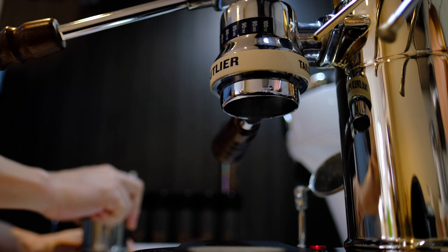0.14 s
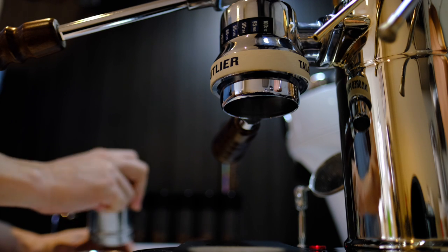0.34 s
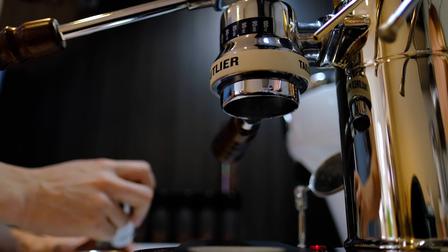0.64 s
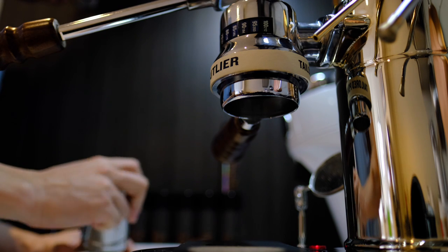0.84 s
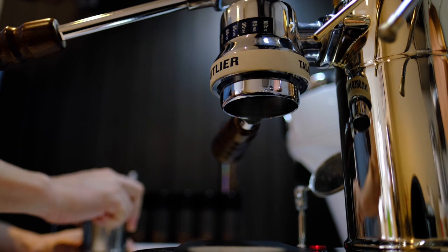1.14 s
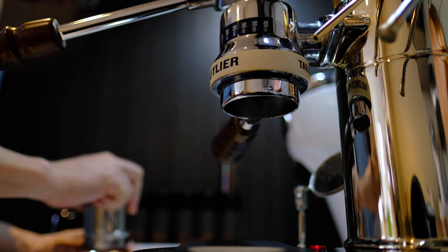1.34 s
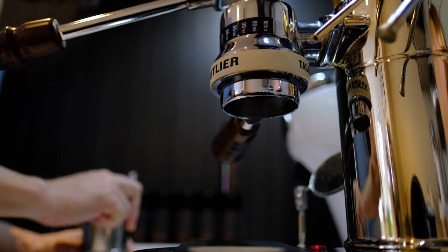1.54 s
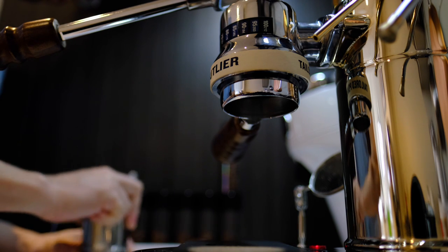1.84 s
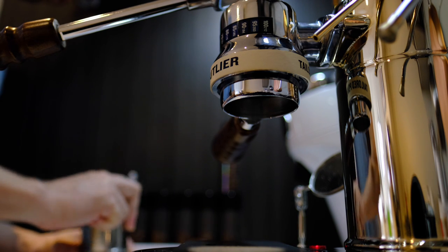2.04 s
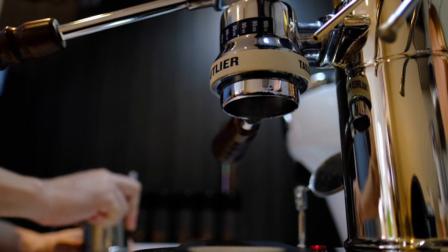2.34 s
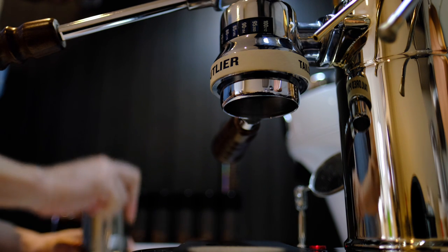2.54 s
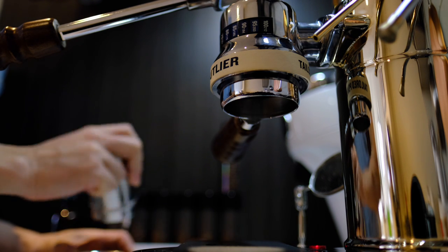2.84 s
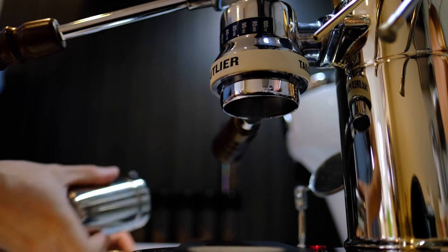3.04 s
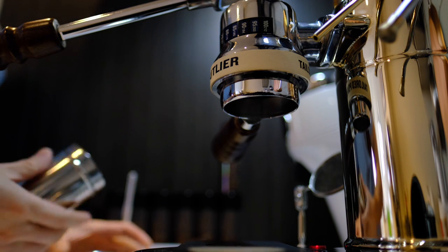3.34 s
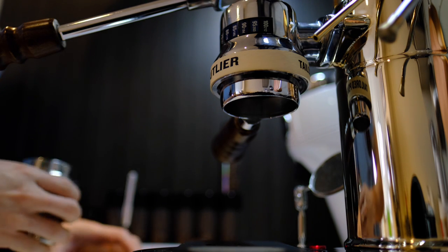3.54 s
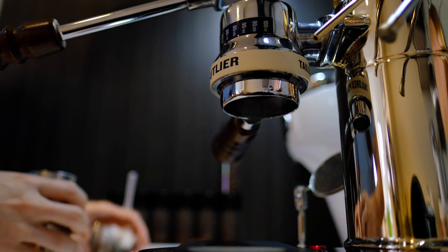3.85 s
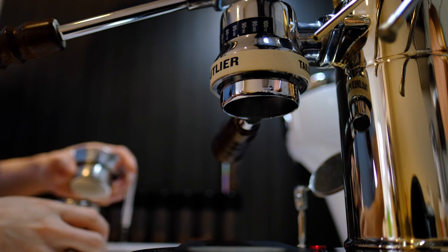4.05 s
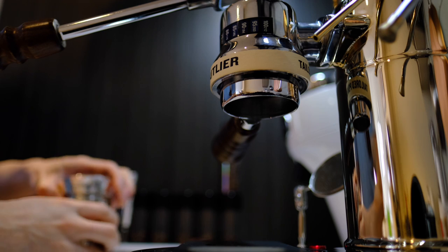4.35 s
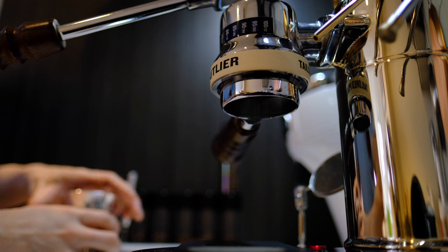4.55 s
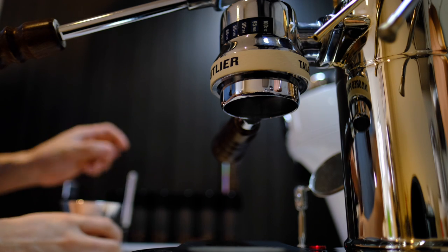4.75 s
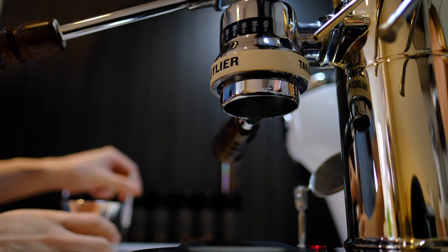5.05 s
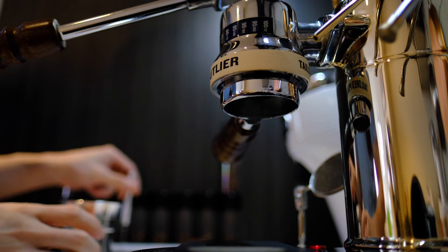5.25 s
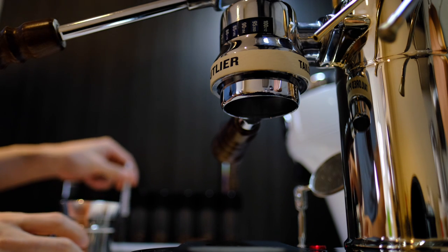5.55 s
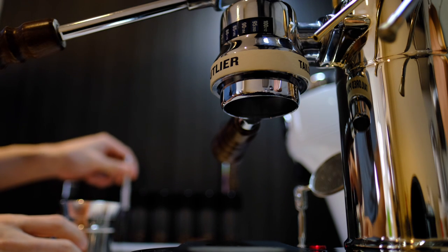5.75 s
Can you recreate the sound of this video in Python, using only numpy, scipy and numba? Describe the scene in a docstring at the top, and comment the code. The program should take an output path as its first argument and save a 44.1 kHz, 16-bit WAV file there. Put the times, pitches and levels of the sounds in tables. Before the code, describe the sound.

A steel cup knocks sharply and repeatedly on a portafilter, then clinks, and a small glass is set down over a faint machine hum.

```python
"""A steel dosing cup knocks on a portafilter at an espresso machine, then slides off, clinks and is set down.
Each blow is a noise crack, a thud and the ringing modes of the struck piece. A small glass lands and rocks,
a faint, very high whistle glides and a small tool tinks. The close blows overload the microphone; its gain
control ducks the room and lets it swell back. Machine hum, ventilation and a thin hiss lie underneath."""
import sys
import numpy as np
from scipy import signal
from scipy.fft import rfft, irfft
from scipy.io import wavfile
from scipy.ndimage import uniform_filter1d
from numba import njit

SR = 44100
rng = np.random.default_rng(int(sys.argv[2]) if len(sys.argv) > 2 else 0)


def output_pcm(signal):
    """Save a mono or channel-first signal as 16-bit PCM at the path in sys.argv[1].

    Samples are clipped to [-1, 1] before scaling.
    """
    pcm = np.clip(np.atleast_2d(signal).T, -1, 1) * 32767
    wavfile.write(sys.argv[1], SR, np.round(pcm).astype(np.int16))


N = 260190
T = np.arange(N) / SR

# Blows. Each row: start in seconds, level in dB, thud pitch in Hz, thud level in dB relative to the crack.
CUP_KNOCKS = [(0.0, -17.5, 1080, -2), (0.1877, -10.5, 776, 5.5), (1.5384, 3.5, 738, 2),
              (1.5445, 4, 1581, -4), (1.8208, 6, 966, -7), (2.0746, 8.5, 954, -6), (2.3373, 3, 900, 3),
              (2.5974, 10.5, 1040, -12)]  # on the portafilter
CUP_SEATING = [(1.0211, -15.3, 1141, 1)]  # into the basket rim
CUP_CLINKS = [(3.262, -68, 2780, 16), (3.384, -62, 902, -6), (3.554, -60, 2730, 10), (3.671, -61, 2730, -8),
              (4.1965, -10, 817, 10), (4.229, -27, 1400, 12), (4.404, -12, 1576, -3),
              (4.412, -13, 1570, -10)]  # loose, bouncing
GLASS_LANDING = [(4.7178, -12.5, 977, 13), (4.7215, -19, 1590, 16)]  # one edge, then flat
TOOL_TINKS = [(5.131, -49.5, 2160, -5), (5.549, -55.5, 2170, -10)]  # against the rim

# Modes of the struck pieces. Each row: frequency in Hz, level in dB, t60 in seconds.
PORTAFILTER_MODES = [(205, -25.5, .16), (1616, -3.5, .035), (2096, -4, .04), (2727, -5, .04),
                     (3130, -1.5, .04), (3400, -2.5, .04), (3660, 1, 0.034), (3781, -4.5, 0.065),
                     (6310, -13.5, 0.045), (8004, -12.5, .04), (9130, -12.5, .04), (9500, -10.5, 0.02),
                     (13040, -9, 0.06)]
RIM_MODES = [(701, -8.5, .03), (1480, -10, 0.06), (2010, -10, .04), (2710, -7.5, .06), (2800, -12, 0.16),
             (2900, -11.5, 0.19), (2970, -4.5, .07), (3780, -15, .15), (4716, -2, 0.045), (5270, -2, 0.04),
             (5800, -1.5, .035), (7440, -12.5, .08), (9162, -1, 0.05), (10370, -2.5, .04),
             (11750, -6.5, .05)]
CUP_MODES = [(1664, -8, .035), (2400, -9, 0.024), (2760, -11.5, .11), (2910, -11, .05), (3765, -1, 0.035),
             (3777, -18, .45), (3786, -22, .4), (5405, -7, .1), (7320, -4, .06), (7410, -1, .06),
             (7620, -5, .1), (7960, -3, .02), (8350, -16.5, .08), (9340, -17, .06), (12700, -14, .08)]  # the close pair beats
GLASS_MODES = [(137, -18, 0.09), (210, -24, .12), (923, -16.5, 0.17), (1650, -8.5, 0.037), (2790, -14, .1),
               (3700, -5, 0.035), (5750, -28, .08), (7405, -2, 0.07), (8400, -16, 0.046),
               (12845, -11, 0.11)]  # includes the boom of the tray
TOOL_MODES = [(2220, 0, 0.25), (3418, -12, .16), (5599, -5, 0.16), (12748, -10, .12)]

# Metal sliding on metal. Each row: peak time in seconds, half-width in seconds, level in dB, centre in Hz.
METAL_SLIDES = [(1.222, .05, -48.5, 1430), (3.645, 0.043, -60, 5970), (4.332, 0.018, -36.5, 2800),
                (4.401, .004, -32, 5500), (5.629, 0.089, -68, 7000)]
# Room decay. Each row: frequency in Hz, t60 in seconds.
ROOM_DECAY = [(200, 0.41), (1000, 0.64), (3000, 0.54), (7000, 0.46), (14000, 0.23)]
# Mains and fan lines. Each row: frequency in Hz, rms level in dB.
HUM_LINES = [(59.5, -56.5), (119.6, -50.5), (212, -63.5), (223, -62), (550, -61.5), (1710, -74)]
# Noise spectra. Each row: frequency in Hz, relative spectral density in dB.
CRACK_SPECTRUM = [(25, -26.5), (90, -17.5), (200, -2.5), (380, -5.5), (700, -4), (1500, 0), (3200, -1),
                  (4400, -5), (6500, -5), (8500, -3.5), (11000, -5), (13500, -2), (16000, -7.5)]
VENT_SPECTRUM = [(15, -35.5), (25, -8.5), (123, -4), (175, -16.5), (223, -10), (270, -16.5), (416, -19),
                 (451, -18), (545, -16), (796, -22), (1610, -30.5), (1740, -32.5), (3080, -44.5),
                 (7110, -51.5), (16000, -53.5)]
HISS_SPECTRUM = [(12500, -59.5), (13500, -8.5), (14080, -0.5), (14500, -7.5), (16000, -16.5)]


def cup_knocks():
    """The cup strikes the portafilter, whose modes die fast."""
    hits = contacts(CUP_KNOCKS, tilt_db_oct=-1.3, ring_db=-1.8, crack_t60_s=.07,
                    dulling=.07, ring_share=.55, damping=.42, choke=.28)
    return blows(hits, PORTAFILTER_MODES, clatter_db=-9, clatter_t60_s=.2, thud_t60_s=.026, detune=.02)


def cup_seating():
    """The cup settles into the basket and rings its rim."""
    hits = contacts(CUP_SEATING, tilt_db_oct=-1.4, ring_db=1.2, crack_t60_s=.085)
    return blows(hits, RIM_MODES, clatter_db=-11, clatter_t60_s=.22, thud_t60_s=.046, detune=.002)


def cup_clinks():
    """The loose cup bounces and rings."""
    hits = contacts(CUP_CLINKS, tilt_db_oct=-.9, ring_db=3.5, crack_t60_s=.075, dulling=.13, choke=.08)
    return blows(hits, CUP_MODES, clatter_db=-6.5, clatter_t60_s=.31, thud_t60_s=.029, detune=.0015)


def glass(rock_start_s=4.729, gap_s=.0095, first_db=-21, loss_db=1.2, thud_hz=920, thud_db=-4):
    """A glass lands, then rocks to rest in almost evenly spaced, weakening taps."""
    taps = [(rock_start_s + gap_s * (k + .08 * jitter), first_db - loss_db * k, thud_hz, thud_db)
            for k, jitter in enumerate(rng.standard_normal(5))]
    hits = contacts(GLASS_LANDING, tilt_db_oct=-1.5, ring_db=-4, crack_t60_s=.055)
    hits += contacts(taps, tilt_db_oct=-1.6, ring_db=7.5, crack_t60_s=.055)
    return blows(hits, GLASS_MODES, clatter_db=-8.5, clatter_t60_s=.19, thud_t60_s=.019, detune=.0014)


def tool_tinks():
    """A small tool touches the rim and rings."""
    hits = contacts(TOOL_TINKS, tilt_db_oct=-.2, ring_db=1.5, crack_t60_s=.09)
    return blows(hits, TOOL_MODES, clatter_db=-12, clatter_t60_s=.17, thud_t60_s=.05, detune=.003)


def contacts(rows, tilt_db_oct, ring_db, crack_t60_s, dulling=.12, ring_share=0, damping=0, choke=0):
    """Squarer blows (more thud) are duller and ring more; harder ones press home, damping crack and ring."""
    hits = []
    for start_s, level_db, thud_hz, thud_db in rows:
        hit_tilt_db_oct = tilt_db_oct - dulling * thud_db
        hit_ring_db = ring_db + ring_share * thud_db - choke * level_db
        hit_t60_s = crack_t60_s * undb(-damping * level_db)
        hits.append((start_s, level_db, thud_hz, thud_db, hit_tilt_db_oct, hit_ring_db, hit_t60_s))
    return hits


def blows(hits, modes, clatter_db, clatter_t60_s, thud_t60_s, detune):
    """Each blow: a crack scattered by the machine's panels, a thud, and modes detuned by the grip."""
    out, t = np.zeros((2, N)), T[:SR]
    onset = 1 - np.exp(-t / .0007)  # near reflections build up
    for start_s, level_db, thud_hz, thud_db, tilt_db_oct, ring_db, crack_t60_s in hits:
        envelope = fade(t, crack_t60_s) + undb(clatter_db) * fade(t, clatter_t60_s)
        crack = envelope * noise(len(t), CRACK_SPECTRUM, tilt_db_oct, ragged_db=4)
        thud = undb(thud_db) * ring(t, thud_hz, thud_t60_s)
        body = np.zeros_like(crack)
        for hz, mode_db, t60_s in modes:
            shift, scatter_db = rng.standard_normal(2)
            gain = undb(ring_db + mode_db + scatter_db + tilt_db_oct * np.log2(hz / 4000))
            body += gain * ring(t, hz * (1 + detune * shift), t60_s)
        add(out, undb(level_db) * onset * (crack + thud + body), start_s)
    return out


def ring(t, hz, t60_s, right_lag_s=.00009):
    """One struck mode; it reaches the left channel first."""
    age_s = np.maximum(t - np.array([[0], [right_lag_s]]), 0)
    return np.sin(2 * np.pi * hz * age_s) * fade(age_s, t60_s)


def slides(grain_db=4, skirt_db=-24):
    """Metal on metal: short swells of gritty friction around one broad resonance."""
    out, t = np.zeros((2, N)), T[:SR] - .5
    for peak_s, half_width_s, level_db, hz in METAL_SLIDES:
        swell = np.exp(-(t / half_width_s) ** 2)
        grit = unit(undb(grain_db * wander(360)[:len(t)]))
        band = [(hz / 16, 2 * skirt_db), (hz / 4, skirt_db), (hz, 0),
                (hz * 4, skirt_db), (hz * 16, 2 * skirt_db)]
        add(out, undb(level_db) * swell * grit * noise(len(t), band, ragged_db=6), peak_s + t[0])
    return out


def thin_whistle(start_s=4.87, rise_s=.19, fall_s=.095, base_hz=12700, climb_hz=2300,
                 level_db=-73, flicker_db=6):
    """A faint, broken, very high whistle that glides up and back down."""
    glide = np.interp(T, start_s + np.cumsum([0, rise_s, fall_s]), [0, 1, 0])
    pitch_hz = (base_hz + climb_hz * glide) * (1 + .015 * wander(900))
    return undb(level_db + flicker_db * wander(60)) * (glide > 0) * sine(pitch_hz)


def room(x, level_db=-16.5, build_s=.012):
    """Diffuse tail; the top treble dies first."""
    t, f = T[:SR], np.fft.rfftfreq(SR, 1 / SR)
    band_hz, band_t60_s = np.transpose(ROOM_DECAY)
    white = rfft(noise(SR, [(100, 0), (16000, 0)]))
    tail = np.zeros((2, SR))
    for band, t60_s in zip(np.eye(len(band_hz)), band_t60_s):
        weight = np.interp(np.log(f + 1), np.log(band_hz), band)
        tail += irfft(white * weight, SR) * fade(t, t60_s)
    tail *= 1 - np.exp(-t / build_s)
    tail /= np.sqrt(np.sum(tail[0] ** 2))
    return undb(level_db) * signal.fftconvolve(x, tail, axes=1)[:, :N]


def machine_hum(waver_db=2, drift=.005):
    """Mains and fan lines, wavering in level and pitch."""
    hum = np.zeros(N)
    for hz, rms_db in HUM_LINES:
        amplitude = np.sqrt(2) * undb(rms_db + waver_db * wander(6))
        hum += amplitude * sine(hz * (1 + drift * wander(90)))
    return hum


def ventilation(level_db=-45.5, waver_db=.8):
    """Low rumble of moving air."""
    return undb(level_db + waver_db * wander(5)) * noise(N, VENT_SPECTRUM, wide_hz=5000)


def hiss(level_db=-74.5):
    """Thin, steady hiss near 14 kHz."""
    return undb(level_db) * noise(N, HISS_SPECTRUM)


def gain_control(x, limit_db=-8, react_s=.0055, attack_s=.0047, hold_s=.071, release_s=.068):
    """Ducks overloads late, so the first milliseconds of a blow pass at full gain."""
    peak_db = 20 * np.log10(np.abs(x).max(axis=0) + 1e-9)
    over_db = np.maximum(peak_db - limit_db, 0)
    cut_db = duck(over_db, hold_s * SR, release_s * SR, attack_s * SR)
    return x * undb(-np.interp(T - react_s, T, cut_db, left=0))


@njit
def duck(over_db, hold_samples, release_samples, attack_samples):
    """Gain reduction in dB: follows each overload, holds, releases."""
    cut_db = np.empty(len(over_db))
    held_db, smooth_db, age = 0., 0., 0
    for i in range(len(over_db)):
        age += 1
        if over_db[i] > held_db:
            held_db, age = over_db[i], 0
        elif age > hold_samples:
            held_db -= held_db / release_samples
        smooth_db += (held_db - smooth_db) / attack_samples
        cut_db[i] = smooth_db
    return cut_db


def noise(size, spectrum, tilt_db_oct=0, ragged_db=0, wide_hz=2800, spacing_hz=110):
    """Shaped stereo noise, rms 1, with optional crowded resonances; the channels agree in the bass only."""
    f = np.maximum(np.fft.rfftfreq(size, 1 / SR), 1)
    hz, db = np.transpose(spectrum)
    shape_db = np.interp(np.log(f), np.log(hz), db) + tilt_db_oct * np.log2(np.maximum(f / 700, 1))
    peaks = np.interp(f / spacing_hz, np.arange(400), rng.standard_normal(400)) * np.minimum(f / 3000, 1)
    mid, side = rfft(rng.standard_normal((2, size)))
    width = np.clip(.067 + f / wide_hz, 0, 1)
    stereo = mid + width * side * np.array([[1], [-1]])
    return unit(irfft(undb(shape_db + ragged_db * peaks) * stereo, size))


def wander(rate_hz):
    """Smooth random curve, spread near 1."""
    step = int(SR / rate_hz)
    stairs = np.repeat(rng.standard_normal(N // step + 1), step)
    return 1.2 * uniform_filter1d(stairs, step)[:N]


def sine(hz):
    """Sine along a pitch curve."""
    return np.sin(2 * np.pi * np.cumsum(hz) / SR)


def fade(t, t60_s):
    """Exponential decay, 60 dB down at t60_s."""
    return np.exp(-np.log(1000) * t / t60_s)


def undb(db):
    """Decibels to gain."""
    return 10 ** (np.asarray(db) / 20)


def unit(x):
    """Scale to rms 1."""
    return x / np.sqrt(np.mean(x ** 2))


def add(out, x, start_s):
    """Mix x into out from start_s."""
    i = max(int(start_s * SR), 0)
    out[:, i:i + x.shape[1]] += x[:, :N - i]


def scene():
    """Handling noises and the whistle in the room, over the background."""
    direct = cup_knocks() + cup_seating() + cup_clinks() + glass() + tool_tinks()
    direct += slides() + thin_whistle()
    return direct + room(direct) + machine_hum() + ventilation() + hiss()


def record(dry):
    """Gain control, hard clip just above full scale, steep low-pass."""
    clipped = np.clip(gain_control(dry), -1.1, 1.1)
    lowpass = signal.ellip(10, .2, 90, 15900, fs=SR, output="sos")
    return signal.sosfilt(lowpass, clipped)


dry = scene()
out = record(dry)
output_pcm(out)
```